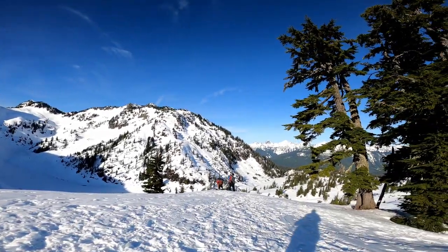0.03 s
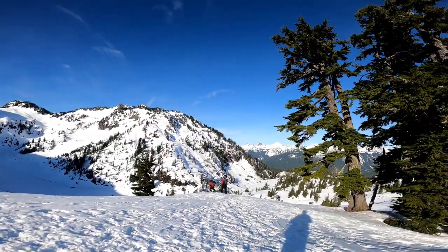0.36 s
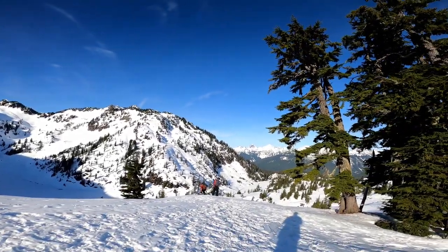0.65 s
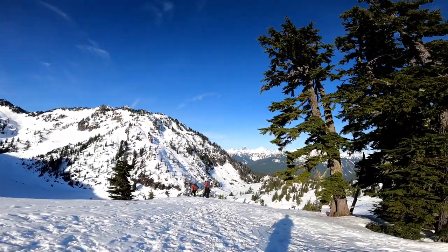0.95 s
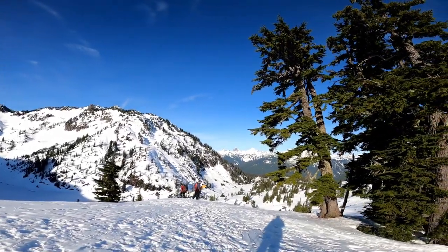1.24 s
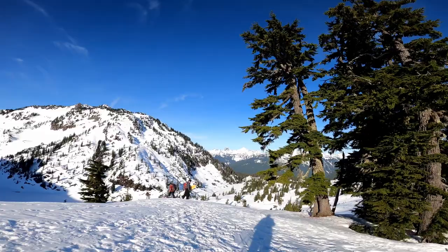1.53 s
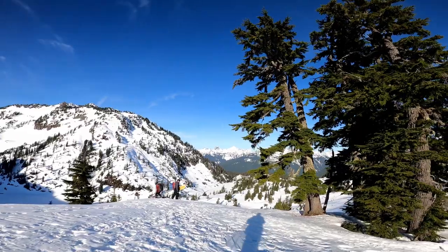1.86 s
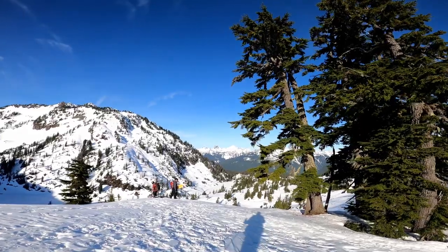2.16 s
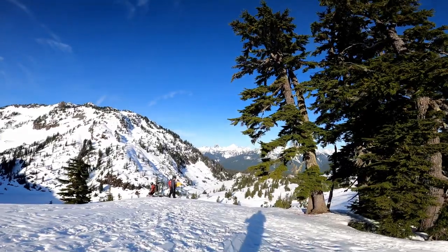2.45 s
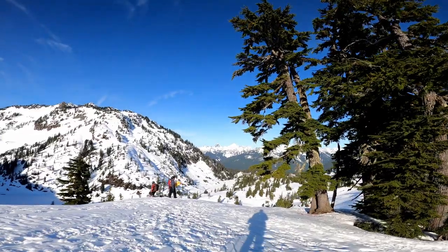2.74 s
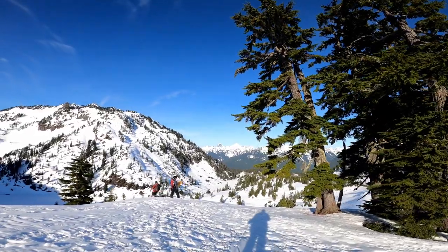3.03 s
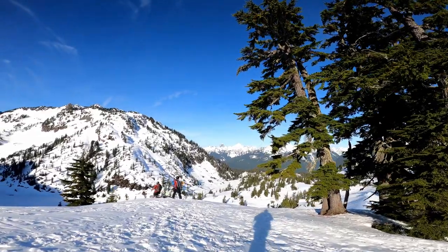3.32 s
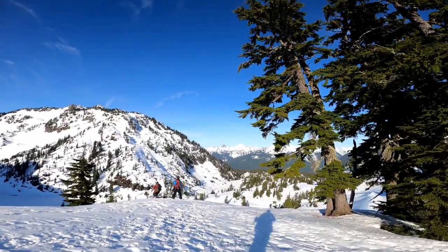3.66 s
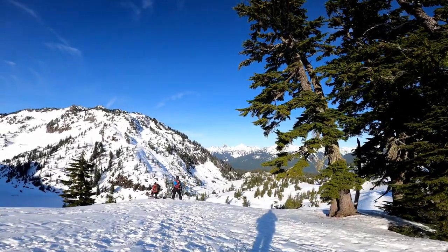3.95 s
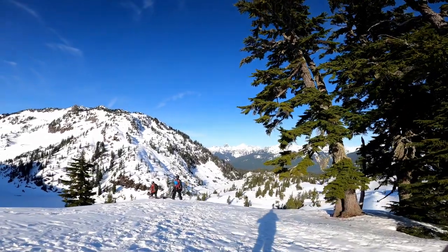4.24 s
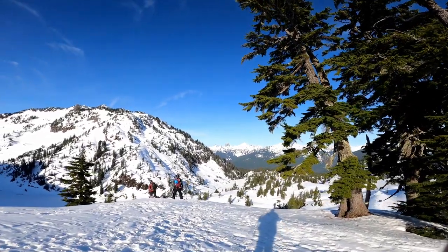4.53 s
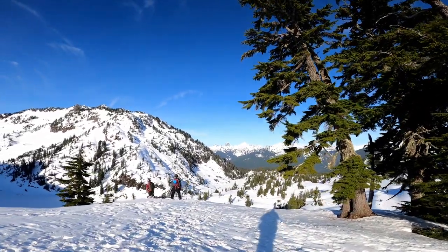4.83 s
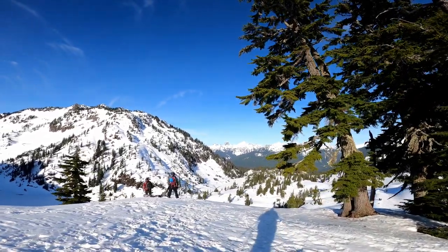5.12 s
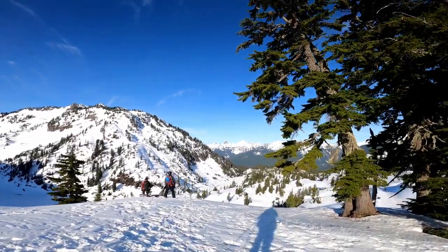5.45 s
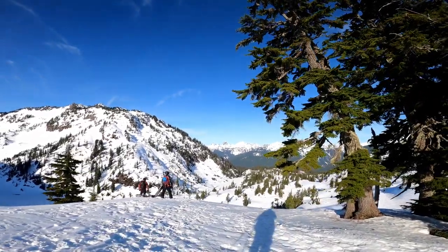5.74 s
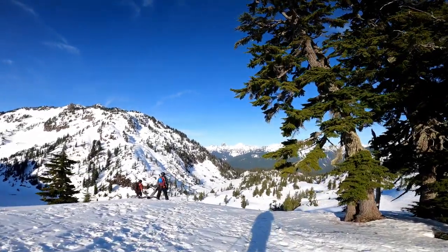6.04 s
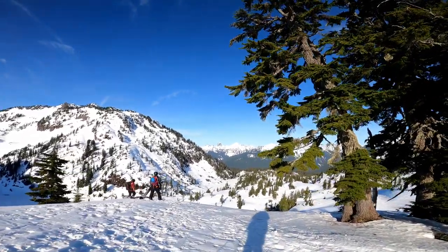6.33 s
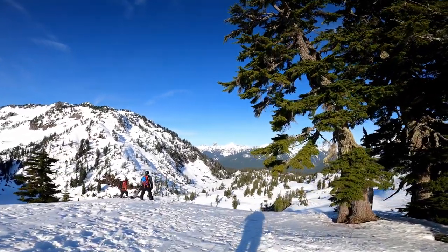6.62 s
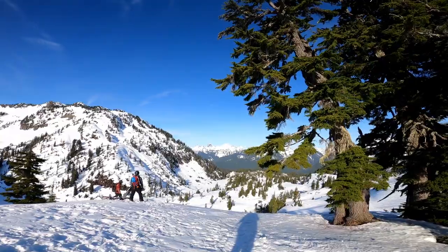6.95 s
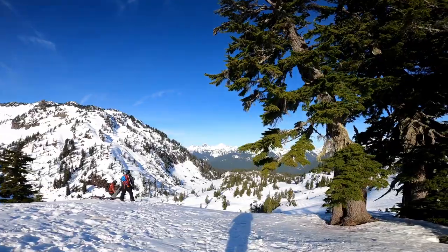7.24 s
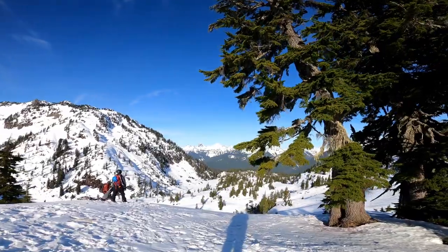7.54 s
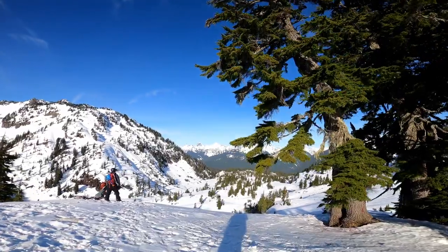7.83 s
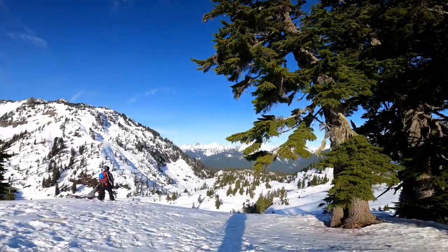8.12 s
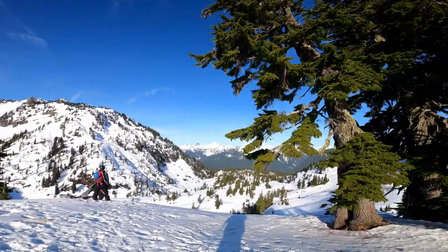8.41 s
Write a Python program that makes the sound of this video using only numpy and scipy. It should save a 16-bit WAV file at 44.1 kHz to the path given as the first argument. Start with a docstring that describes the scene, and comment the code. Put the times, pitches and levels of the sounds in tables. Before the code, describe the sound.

Snowshoes walk at a steady pace over crusted snow, heard close from the walker's position in an open field with no echo. Each step crunches, creaks and packs the snow. Between steps, poles and frames scuff, knock and bite, with sharp icy cracks and a few short metallic clinks. Clothes rustle and nylon sleeves swish. A low rumble swells with the footfalls, and light wind buffets the microphone early on and again near the end.

```python
"""Open snowfield: snowshoes walk over crusted snow, heard from the walker's position.
Each step breaks the crust into thousands of ringing grains, creaks and packs the snow below.
Frames and poles scuff, knock and bite, with bright cracks of icy crust and short metallic clinks.
Clothes rustle softly; light wind on the microphone ports and the footfalls make a low rumble."""
import sys
import numpy as np
from scipy import signal
from scipy.fft import rfft, irfft, next_fast_len
from scipy.io import wavfile
from scipy.ndimage import map_coordinates

SR = 44100
rng = np.random.default_rng(int(sys.argv[2]) if len(sys.argv) > 2 else 0)


def unload_audio(sound):
    """Save the sound as a 16-bit wav file, at the path given as the first command line argument."""
    columns = np.transpose(np.atleast_2d(sound))
    # keep every value between -1 and 1, then stretch to whole-number steps
    steps = np.round(np.clip(columns, -1, 1) * 32767)
    wavfile.write(sys.argv[1], SR, steps.astype(np.int16))


N = 382788
TOP_HZ = 15500

# weight comes onto a snowshoe:
# (time [s], length [s], attack [s], heel surge [dB], crust [dB], packing snow [dB], grit [dB])
FOOTFALLS = [(0.008, 0.15, 0.039, 2, -39.5, -39.5, -50), (0.184, 0.045, 0.014, 8.5, -44, -52.5, -46.5),
             (0.865, .19, 0.083, 4, -37.5, -43.5, -47), (1.552, 0.2, 0.11, 11, -43, -44.5, -47.5),
             (2.162, 0.32, 0.16, 10, -44.5, -46, -51), (2.95, 0.26, 0.03, 9, -42.5, -44, -50),
             (3.703, 0.17, 0.03, 16, -44, -42.5, -48.5), (4.338, 0.28, 0.095, 8, -43, -45.5, -51),
             (5.086, 0.18, 0.036, 16, -48, -49, -53), (5.799, 0.19, 0.015, 4.5, -35.5, -36.5, -40.5),
             (6.531, 0.17, 0.0089, 9, -41.5, -41, -47.5), (7.175, 0.21, 0.02, 10, -41.5, -45, -45),
             (7.87, 0.17, 0.022, 11, -39.5, -42.5, -48), (8.453, 0.19, 0.058, 13, -41, -47, -44.5)]
# metal frame resonances that colour the grit: (centre [Hz], width [Hz], boost [dB])
FRAME_MODES = [(3500, 440, 0.5), (8300, 600, 5.5)]


def amp(db):
    """Decibels to gain."""
    return 10 ** (np.asarray(db) / 20)


def unit(x):
    """Scale to rms 1."""
    return x / np.sqrt(np.mean(x ** 2) + 1e-20)


def along(points, hz):
    """Interpolate (frequency [Hz], value) points on a log axis."""
    points_hz, values = np.transpose(points)
    return np.interp(np.log(hz + 1), np.log(points_hz), values)


def level(curve):
    """Gain per sample from (time [s], level [dB]) points; silent outside them."""
    return amp(np.interp(np.arange(N) / SR, *np.transpose(curve), left=-120, right=-120))


def wobble(rate_hz):
    """Smooth random curve with knots at rate_hz."""
    knots = rng.standard_normal(int(N * rate_hz / SR) + 4)
    return map_coordinates(knots, [np.arange(N) * rate_hz / SR])


def held(start_s, length_s, attack_s, release_s):
    """Linear rise, hold until length_s, exponential fade."""
    t = np.arange(N) / SR - start_s
    return np.clip(t / max(attack_s, .004), 0, 1) * np.exp(-np.maximum(t - length_s, 0) / release_s)


def swell(centre_s, width_s):
    """Bell curve of height 1."""
    return np.exp(-np.minimum(((np.arange(N) / SR - centre_s) / width_s) ** 2, 50))


def filtered(x, response):
    """Apply the gain response(hz)."""
    size = next_fast_len(N + SR // 4)
    return irfft(rfft(x, size) * response(np.fft.rfftfreq(size, 1 / SR)), size)[..., :N]


def resonate(x, modes):
    """Boost each resonance in modes; rms 1."""
    boost_db = lambda f: sum(db / (1 + (2 * (f - hz) / width_hz) ** 2) for hz, width_hz, db in modes)
    return unit(filtered(x, lambda f: amp(boost_db(f))))


def add(track, start_s, sound):
    """Mix a sound into a track."""
    part = track[max(round(start_s * SR), 0):][:len(sound)]
    part += sound[:len(part)]


def noise(spectrum, width):
    """Coloured stereo noise, rms 1; width = side / mid."""
    mid, side = filtered(rng.standard_normal((2, N)), lambda hz: amp(along(spectrum, hz)))
    return unit(np.array([mid + width * side, mid - width * side]))


def jerks(rate_hz, fade_s, spread_db):
    """Snow or fabric gives way in jerks: random quick rises that fade; rms 1."""
    chance, size = rng.random(N), rng.standard_normal(N)
    impulses = (chance < rate_hz / SR) * amp(spread_db * np.tanh(size))
    rise = np.hanning(SR // 700)
    return unit(signal.lfilter(rise, [1, -np.exp(-1 / (fade_s * SR))], impulses))


def grains(lo_hz, hi_hz, rate_hz, cycles, spread, scatter):
    """Breaking ice bonds: tiny damped rings of random pitch, size and pan; stereo, rms 1."""
    when, pitch, size, sign, place = rng.random((int(rate_hz * N / SR), 5)).T
    min_hz, max_hz = lo_hz / 1.4, min(hi_hz * 1.4, TOP_HZ)
    hz = min_hz + (max_hz - min_hz) * pitch
    t = np.arange(int(2 * cycles * SR / lo_hz)) / SR
    turns = np.outer(hz, t).astype(np.float32)
    strength = np.sign(sign - .5) * np.sqrt(hz) * amp(-spread * np.log(size + .01))
    rings = strength[:, None] * np.sin(2 * np.pi * turns) * np.exp(-2 * turns / cycles)
    samples = ((when * N).astype(int)[:, None] + np.arange(len(t))).ravel()
    pan = scatter * (2 * place[:, None] - 1)
    pair = np.array([np.bincount(samples, (rings * gain).ravel(), N)[:N] for gain in (1 + pan, 1 - pan)])
    band = lambda f: 1 / np.sqrt((1 + (lo_hz / (f + 1)) ** 8) * (1 + (f / hi_hz) ** 8))
    # crunch spectrum: (frequency [Hz], density [dB])
    snow_spectrum = [(41, -32), (70, 5.5), (227, 3), (373, -0.5), (457, -3), (585, -1.5), (768, -7),
                     (962, -5), (1810, -9.5), (2490, -14), (3330, -13), (7030, -29), (8230, -32.5),
                     (13500, -43), (15500, -65)]
    return unit(filtered(pair, lambda f: amp(along(snow_spectrum, f)) * band(f)))


def sway(width_s, lag_s=0.093):
    """Body motion, 0-1: one swell just after each footfall."""
    return np.max([swell(start_s + lag_s, width_s) for start_s, *_ in FOOTFALLS], axis=0)


def low_rumble():
    """Lumpy low rumble of wind and footfalls, swelling at each step and in two gusts."""
    # buffeting, one curve per gust: (time [s], level [dB])
    gusts = [
        [(1.25, -76), (1.438, -35.5), (1.672, -35), (1.772, -44), (1.84, -35), (1.982, -42), (2.16, -28.5),
         (2.394, -33.5), (2.506, -53), (2.532, -36.5), (2.716, -45.5), (2.8, -65)],
        [(7.6, -75), (7.702, -41.5), (7.786, -53), (7.894, -36), (8.29, -51), (8.312, -44), (8.352, -56),
         (8.388, -37), (8.432, -52), (8.54, -42), (8.67, -69), (8.68, -65)],
    ]
    # wind and footfall spectrum: (frequency [Hz], density [dB])
    rumble_spectrum = [(15, -4), (35, 2), (55, -0.5), (90, -3.5), (170, -8.5), (260, -20.5), (450, -36),
                       (1000, -75), (3000, -120)]
    rest_db, step_db = -57.5, 10.5
    stride_gain = amp(rest_db + step_db * sway(width_s=0.19))
    gain = np.hypot(stride_gain, amp(2.5) * sum(level(gust) for gust in gusts))
    lumps = amp(2.6 * wobble(22) + 1.5 * np.array([wobble(12), wobble(12)]))  # common + per side
    return gain * unit(lumps * noise(rumble_spectrum, width=0.49)) * amp([[-.4], [.4]])


def rustle():
    """Clothes and loose snow rub throughout, most as the body sways."""
    # rubbing spectrum: (frequency [Hz], density [dB])
    cloth_spectrum = [(53, -11), (90, -2), (138, -5.5), (307, -10.5), (574, -4), (942, -12), (1300, -6.5),
                      (1580, -12.5), (1800, -13.5), (3220, -17.5), (6270, -28), (8480, -37), (15500, -48)]
    rest_db, sway_db = -57.5, 13
    gain = amp(rest_db + sway_db * sway(width_s=0.1) + 3.0 * wobble(6.4))
    friction = unit(4.3 + jerks(rate_hz=110, fade_s=0.002, spread_db=0.5))
    return gain * friction * noise(cloth_spectrum, width=0.25)


def sleeve_swishes():
    """Nylon slides on nylon: a bright, grainy hiss that swells and fades with the arm."""
    # arm swings: (centre [s], length [s], level [dB])
    swings = [(0.09, 0.17, -48.5), (0.336, 0.027, -50), (0.772, 0.13, -57.5), (1.015, 0.15, -55),
              (1.479, 0.22, -52.5), (1.673, 0.21, -51.5), (1.843, 0.14, -66), (2.204, .12, -61),
              (2.385, 0.11, -52.5), (2.56, 0.085, -78), (2.885, 0.18, -57), (4.272, 0.14, -60),
              (4.5, 0.11, -53), (5.01, .12, -65)]
    # hiss spectrum: (frequency [Hz], density [dB])
    nylon_spectrum = [(2500, -50), (4500, 1), (6000, 0), (7600, 0.5), (8800, -6.5), (10500, -17),
                      (15000, -26)]
    gain = np.zeros(N)
    for centre_s, length_s, db in swings:
        add(gain, centre_s - length_s / 2, amp(db) * np.sqrt(np.hanning(int(length_s * SR))))
    friction = unit(0.5 + jerks(rate_hz=270, fade_s=0.0044, spread_db=3))
    return gain * friction * noise(nylon_spectrum, width=0.42)


def cracks_and_clinks():
    """Bright, sharp cracks of icy crust and short metallic clinks: a tick, then two close modes."""
    # cracks and clinks: (time [s], level [dB], pitch [Hz], t60 [s])
    events = [(0.158, -27, 3000, 0.0093), (0.605, -32, 2500, 0.013), (2.256, -17, 3370, 0.0068),
              (2.264, -16, 3500, 0.0048), (2.304, -26, 3460, .012), (3.775, -18.5, 3880, 0.011),
              (5.069, -29.5, 3780, 0.03), (5.091, -32, 4020, .02), (5.101, -37, 4320, .02),
              (5.487, -25.5, 2020, 0.014), (5.541, -27, 2330, 0.0088), (5.772, -25, 4650, 0.037),
              (5.787, -44, 4600, 0.03), (6.63, -22, 3400, 0.0091), (7.001, -23.5, 1700, 0.0086),
              (7.183, -30, 4950, 0.023), (7.191, -36, 4650, 0.04), (7.743, -28, 1680, 0.024),
              (8.411, -6.5, 2480, 0.0042), (8.530, -28, 4450, .012)]
    rings, ticks, t = np.zeros(N), np.zeros(N), np.arange(SR // 8) / SR
    for start_s, db, hz, t60_s in events:
        ring = np.sin(2 * np.pi * hz * t) + 0.099 * np.sin(2 * np.pi * (hz * 1.2 * t + rng.random()))
        add(rings, start_s, amp(db - 60 * t / t60_s) * ring * (1 - np.exp(-t / 0.0012)))
        add(ticks, start_s, amp(db) * np.exp(-t / 0.00068) * rng.standard_normal(len(t)))
    tick_band = lambda hz: hz / (hz + 1000) / (1 + (hz / 6000) ** 5)
    return amp(1) * rings + amp(-7.5) * filtered(ticks, tick_band)


def heel_thuds():
    """The heel presses the deck into soft snow: a low push of a cycle or two."""
    # heel pushes: (time [s], level [dB], pitch [Hz])
    pushes = [(0.976, -18.5, 89), (2.992, -34, 90), (3.152, -31.5, 84), (3.759, -26, 100),
              (5.317, -28.5, 80), (6.541, -27.5, 74), (7.052, -34, 70), (8.378, -26, 100)]
    out, t = np.zeros(N), np.arange(SR // 10) / SR
    for start_s, db, hz in pushes:
        add(out, start_s, -amp(db) * np.sin(2 * np.pi * hz * t) * np.exp(-((hz * t - .8) / 0.5) ** 2))
    return out


def deck_knocks():
    """The knocked deck rings low and briefly, damped by the snow."""
    # blows to the deck: (time [s], level [dB])
    blows = [(0.326, -21.5), (0.606, -27), (0.651, -22.5), (0.977, -25), (1.828, -23.5), (2.133, -27),
             (4.074, -29.5), (4.226, -22.5), (4.798, -22.5), (4.941, -41), (5.321, -25), (6.256, -42),
             (6.908, -28.5), (8.233, -29.5), (8.308, -19.5), (8.335, -22), (8.38, -23)]
    # deck modes: (frequency [Hz], level [dB], t60 [s])
    deck_modes = [(171, -2.5, 0.13), (208.4, -1, 0.12), (295, -1.5, 0.059), (460, -19.5, 0.052)]
    out, t = np.zeros(N), np.arange(SR // 6) / SR
    for start_s, db in blows:
        detune = 1 + 0.22 * rng.standard_normal()
        ring = sum(amp(mode_db + rng.normal(0, 1.8) - 60 * t / t60_s)
                   * np.sin(2 * np.pi * hz * detune * t) for hz, mode_db, t60_s in deck_modes)
        add(out, start_s, amp(db - 7.5) * ring * (1 - np.exp(-t / 0.0015)))
    return out


def snow_creaks():
    """Cold snow sticks and slips under the frame about 400 times a second; each slip rings briefly."""
    # frame slides: (time [s], length [s], pitch [Hz], level [dB])
    slides = [(0.178, 0.069, 1445, -33.5), (0.774, 0.081, 524, -31.5), (0.911, 0.09, 1820, -42),
              (1.551, 0.19, 1665, -36), (1.64, 0.092, 1480, -36.5), (2.211, 0.058, 1600, -33.5),
              (2.287, 0.083, 1550, -37), (3.681, 0.052, 715, -29), (4.358, 0.052, 1530, -32),
              (5.113, 0.025, 900, -35), (5.745, 0.036, 1520, -37.5), (7.179, 0.069, 1444, -31.5),
              (8.464, 0.041, 1470, -31.5)]
    out, t = np.zeros(N), np.arange(SR // 100) / SR
    for start_s, length_s, hz, db in slides:
        train = np.zeros(int(length_s * SR) + len(t))
        gaps, bends, sizes = rng.standard_normal((96, 3)).T
        slips_s = np.cumsum(.0025 * np.exp(0.38 * gaps))
        for slip_s, bend, size in zip(slips_s[slips_s < length_s], bends, sizes):
            turns = hz * (1 + 0.095 * bend) * t
            ring = np.sin(2 * np.pi * turns) * turns * np.exp(-turns / 2.6)
            arch = np.sqrt(np.sin(np.pi * slip_s / length_s))
            add(train, slip_s, amp(2.1 * size) * arch * ring)
        add(out, start_s, amp(db - 6.0) * unit(train))
    return out


def crust_snaps():
    """A plate of crust breaks: one or two strong swings and a short spray of splinters."""
    # plate fractures: (time [s], level [dB], pitch [Hz])
    fractures = [(0.22, -9, 2040), (0.229, -6.5, 1350), (0.606, -34, 404), (0.652, -24, 415),
                 (0.923, -12, 1740), (1.613, -9, 1580), (2.534, -21, 610), (2.91, -21, 530),
                 (2.927, -19.5, 895), (3.775, -24, 583), (4.081, -19.5, 740), (4.396, -5, 1090),
                 (4.799, -15, 430), (5.134, -4, 1130), (5.142, -6, 520), (5.15, -2.5, 1070),
                 (5.462, -23.5, 668), (5.499, -33, 900), (5.647, -22, 810), (5.667, -11.5, 450),
                 (6.256, -18, 520), (6.34, -27, 1570), (6.382, -16.5, 885), (6.53, -23, 730),
                 (6.539, -13.5, 443), (7.226, -26, 1540), (7.262, -12.5, 1650), (7.717, -21, 804),
                 (7.742, -8, 1320), (8.235, -16, 510), (8.359, -21, 820), (8.409, -12, 1830)]
    out, t = np.zeros(N), np.arange(SR // 30) / SR
    for start_s, db, hz in fractures:
        turns = hz * t
        swing = np.sin(2 * np.pi * turns) * (1 - np.exp(-turns / 0.4)) * np.exp(-turns / 1.14)
        spray = signal.lfilter([.25], [1, -.75], rng.standard_normal(len(t))) * np.exp(-t / 0.0021)
        add(out, start_s + 0.001766, amp(db - 3.5) * (swing + 0.1 * spray))
    return filtered(out, lambda hz: 1 / (1 + (hz / 8200) ** 8))


def tip_bites():
    """A pole tip or claw pierces the crust: a burst of grains that stops once it is through."""
    # punctures: (time [s], level [dB], relative grit [dB], length [s])
    punctures = [(0.188, -30, -19, 0.011), (0.32, -22.5, -13, 0.026), (0.603, -23, -16, 0.0039),
                 (0.631, -35, -8, 0.0057), (0.679, -28.5, -16, 0.0091), (0.738, -34, -24, 0.011),
                 (1.087, -30.5, -15, 0.0088), (1.372, -35.5, -8.5, 0.013), (1.894, -36.5, -14, 0.042),
                 (1.963, -37, -16, 0.015), (2.083, -43, -4.5, 0.0086), (2.75, -40, -11, 0.018),
                 (2.982, -25, -21, 0.017), (3.352, -31.5, -2.5, 0.0072), (3.544, -27.5, -12, 0.011),
                 (3.586, -27.5, -21, 0.0096), (3.826, -26, -15, 0.033), (3.896, -19, -22.5, 0.0066),
                 (4.072, -23.5, -15, 0.015), (4.217, -24, -8.5, 0.011), (4.593, -21, -20, 0.013),
                 (4.689, -35, -22, 0.0082), (4.719, -28, -21, 0.009), (4.759, -33.5, -15, 0.033),
                 (4.797, -22, -23, 0.011), (4.943, -21.5, -17, 0.015), (5.066, -22.5, -14, 0.014),
                 (5.224, -28.5, -8, 0.0098), (5.313, -28, -10.5, 0.021), (5.438, -23, -14, 0.0067),
                 (5.492, -26.5, -12.5, 0.015), (5.55, -27, -12.5, 0.015), (5.575, -24, -7.5, 0.0082),
                 (5.598, -32, -8, 0.008), (5.657, -19.5, -26, 0.012), (5.807, -20, -19, 0.022),
                 (6.117, -30.5, -11, 0.017), (6.203, -32.5, -16, 0.013), (6.226, -42, -0.5, 0.0099),
                 (6.523, -15, -43, 0.018), (6.905, -28.5, -13.5, 0.012), (7.182, -26.5, -24, 0.011),
                 (7.535, -28, -15.5, 0.016), (7.715, -20.5, -18.5, 0.0074), (7.884, -21, -25, 0.0095),
                 (8.231, -19.5, -21, 0.0056), (8.255, -30, -12.5, 0.0074), (8.326, -28.5, -11.5, 0.012),
                 (8.36, -34, -18, 0.0075)]
    # hollow gear resonances: (centre [Hz], width [Hz], boost [dB])
    hollow_modes = [(768, 55, 12), (1204, 470, 4), (1720, 290, 4.5)]
    crust_gain, grit_gain, t = np.zeros(N), np.zeros(N), np.arange(SR // 10) / SR
    for start_s, db, grit_db, length_s in punctures:
        push = amp(db) * (1 - np.exp(-t / 0.00053)) / (1 + (t / length_s) ** 4)
        add(crust_gain, start_s + 0.0016, push)
        add(grit_gain, start_s + 0.00029, amp(grit_db) * push)
    crust = grains(300, 2200, rate_hz=1800, cycles=1.8, spread=0.3, scatter=0.09)
    grit = grains(2170, 13000, rate_hz=5000, cycles=2.6, spread=4.0, scatter=0.6)
    return (amp(-12.0) * crust_gain * resonate(crust, hollow_modes)
            + amp(-7.5) * grit_gain * resonate(grit, FRAME_MODES))


def pressure():
    """Gains of crust, packing snow and grit: a step surges under the heel, a scuff stays even."""
    # an unloaded frame or pole drags: (time [s], length [s], crust [dB], packing snow [dB], grit [dB])
    scuffs = [(0.28, 0.11, -55, -66, -55.5), (0.42, 0.15, -57, -60, -71), (0.733, 0.095, -37.5, -36.5, -49),
              (1.294, 0.026, -48.5, -49, -53), (1.418, 0.174, -44, -45.5, -51.5),
              (2.128, 0.11, -49, -42.5, -53.5), (2.841, 0.069, -41, -40.5, -51.5),
              (3.315, 0.093, -51.5, -56, -56.5), (3.544, 0.19, -49, -49, -62.5),
              (4.213, 0.19, -42.5, -41.5, -53), (4.663, 0.15, -64, -49, -67),
              (4.94, 0.15, -44.5, -43.5, -54), (5.361, 0.088, -45.5, -49, -63),
              (5.593, .11, -42.5, -40, -49.5), (5.752, 0.09, -39.5, -52, -46.5),
              (6.141, 0.13, -59, -51.5, -63), (6.366, 0.077, -45, -48, -58.5),
              (6.761, 0.015, -50.5, -51, -52), (7.037, .13, -45, -43, -50), (7.73, 0.21, -48.5, -48, -59.5),
              (8.164, 0.098, -53.5, -47, -66), (8.355, 0.12, -35.5, -43.5, -44.5)]
    heel_share = [1, 0.95, 0.75]  # crust, packing snow, grit
    treads = np.zeros((3, N))
    for start_s, length_s, attack_s, heel_db, *layers_db in FOOTFALLS:
        load = held(start_s, length_s, attack_s, release_s=.02)
        surge_db = heel_db * swell(start_s + attack_s, width_s=0.077)
        on = load > 1e-3
        treads[:, on] += load[on] * amp(np.array(layers_db)[:, None] + np.outer(heel_share, surge_db[on]))
    drags = sum(np.outer(amp(layers_db), held(start_s, length_s, attack_s=.008, release_s=0.025))
                for start_s, length_s, *layers_db in scuffs)
    return np.hypot(treads, drags)


def step_crunch():
    """Crust breaks, snow packs and fine ice scatters in the same jerks; larger bonds crackle on top."""
    give = unit(1.35 + jerks(rate_hz=160, fade_s=.004, spread_db=3.5))
    crust = grains(600, 2400, rate_hz=2400, cycles=2.6, spread=2.0, scatter=.12)
    pack = grains(137, 560, rate_hz=700, cycles=1.58, spread=2.14, scatter=0.045)
    grit = grains(2500, 14000, rate_hz=6000, cycles=2.6, spread=2.6, scatter=.5)
    crackle = grains(1230, 7200, rate_hz=160, cycles=4.7, spread=3.0, scatter=.2)
    crust_gain, pack_gain, grit_gain = pressure()
    crunch = (amp(-0.88) * crust_gain * crust + amp(0.2) * pack_gain * pack
              + amp(-0.57) * grit_gain * resonate(grit, FRAME_MODES))
    return give * crunch + amp(-13.5) * crust_gain * crackle


def scene():
    """No echo; the feet lie to the left. Mid-walk the image is near mono, except the top treble."""
    # walker's stereo balance: (frequency [Hz], left minus right [dB])
    balance = [(100, 1), (300, 0.4), (700, 2.5), (1400, 4.5), (3000, 4.5), (6000, 4.5), (9000, 1)]
    # stereo width below the top treble: (time [s], side gain [ratio])
    width_curve = [(0, 1), (1.0, 1.2), (1.4, 1.56), (2.4, 1.45), (2.75, 0.27), (3.1, 0.011), (6.0, 0.0057),
                   (6.6, 0.33), (7.4, 0.74), (8.1, 1), (8.68, 1.04)]
    walker = (step_crunch() + tip_bites() + crust_snaps() + snow_creaks() + deck_knocks()
              + heel_thuds() + cracks_and_clinks() + sleeve_swishes() + rustle())
    left, right = filtered(walker, lambda hz: amp(np.outer([.5, -.5], along(balance, hz)))) + low_rumble()
    mid, side = (left + right) / 2, (left - right) / 2
    side_top = filtered(side, lambda hz: 1 - 1 / (1 + (hz / 9500) ** 12))
    width = np.interp(np.arange(N) / SR, *np.transpose(width_curve))
    side = width * (side - side_top) + amp(6.0) * side_top
    return np.array([mid + side, mid - side])


def record(dry):
    """The microphone rolls off the top treble and passes nothing above TOP_HZ."""
    return filtered(dry, lambda hz: (hz < TOP_HZ) / (1 + (hz / 14400) ** 20))


dry = scene()
out = record(dry)
unload_audio(out)
```